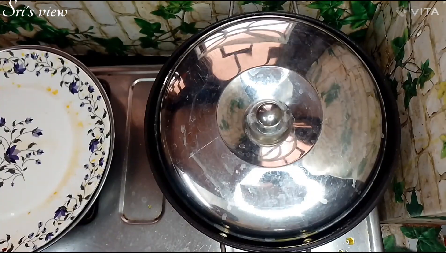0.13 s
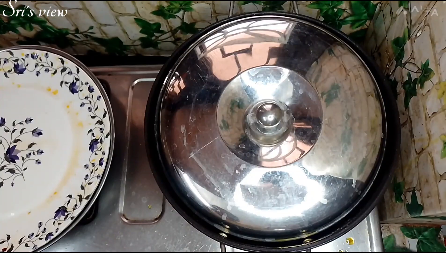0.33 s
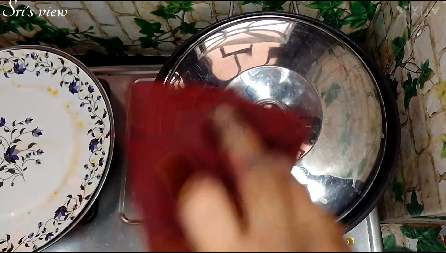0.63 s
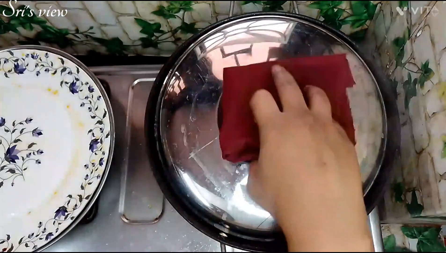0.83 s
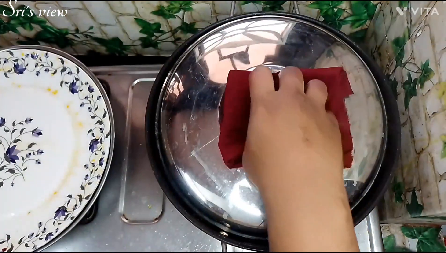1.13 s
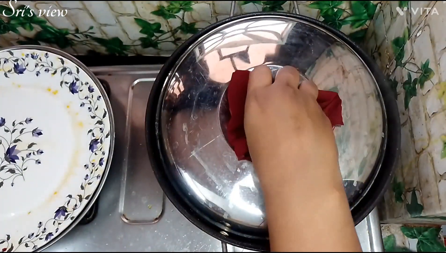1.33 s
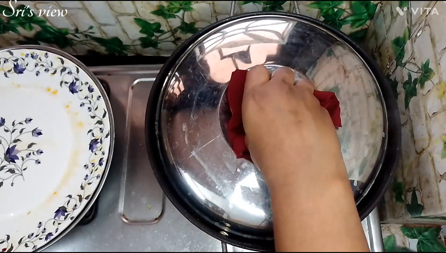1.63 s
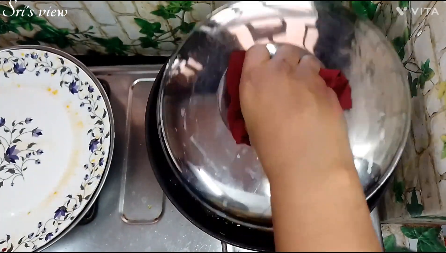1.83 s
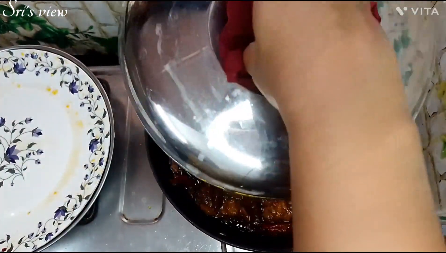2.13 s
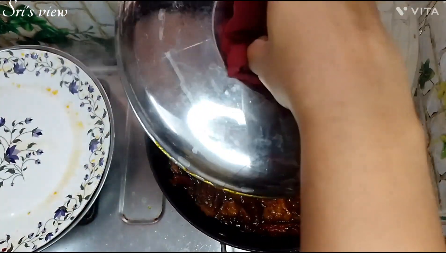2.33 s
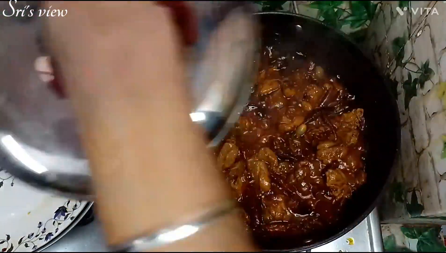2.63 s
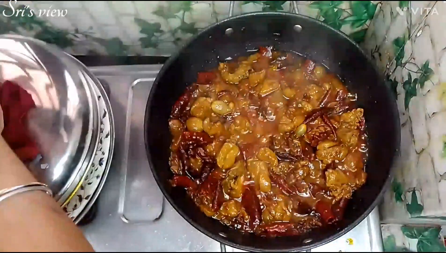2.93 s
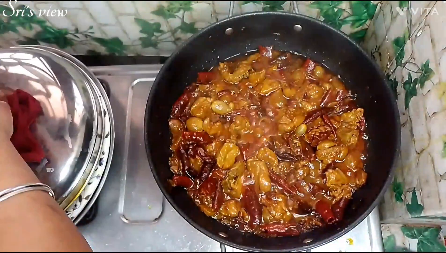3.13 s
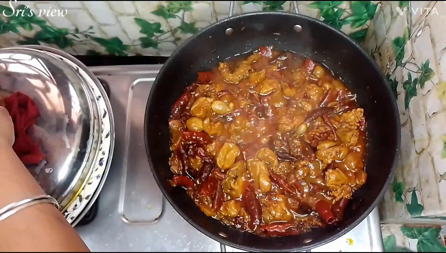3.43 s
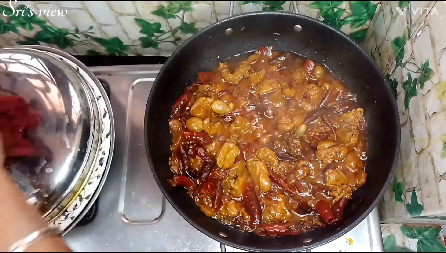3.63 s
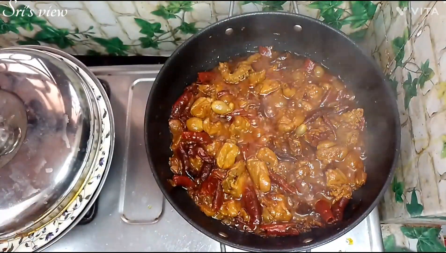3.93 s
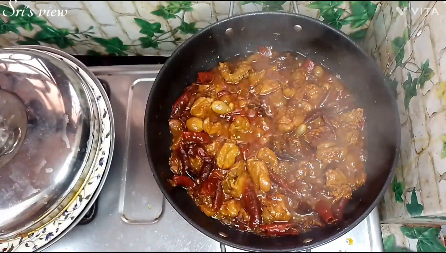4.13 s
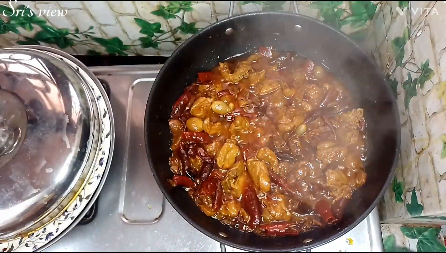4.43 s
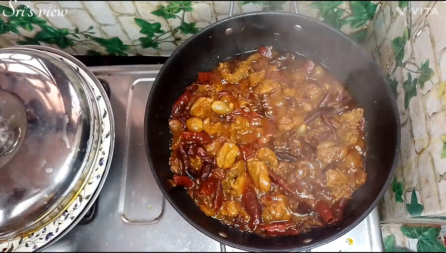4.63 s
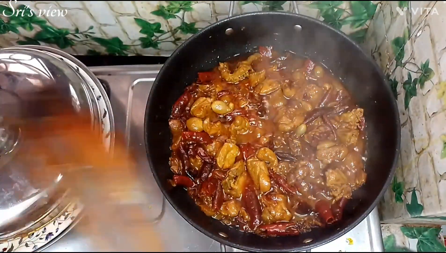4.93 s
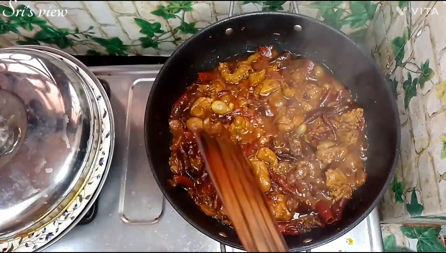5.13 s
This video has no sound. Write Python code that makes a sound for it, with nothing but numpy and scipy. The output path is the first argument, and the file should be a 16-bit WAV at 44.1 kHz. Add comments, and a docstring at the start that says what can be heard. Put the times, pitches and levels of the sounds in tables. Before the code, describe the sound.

A stew simmers faintly under a steel lid in a kitchen, and a crow caws once outside. The lid is gripped with a small knock and scrapes off the rim. The open pan sizzles much louder, spitting and crackling close to the microphone. The lid lands on a plate with two thuds, chatters and rings briefly, and then the sizzle eases.

```python
"""A stew simmers under a steel lid on a gas ring: steam bubbles fizz, larger ones make the trapped air hum.
At 0.5 s a crow caws once outside, its throat pulses ragged, then steadier, then fraying.
The lid is gripped at 1.3 s and dragged off the rim near 2 s, its steel catching and slipping.
The open pan sizzles louder and spits as drops of water burst in the fat.
At 3.4 s the lid thuds onto a plate, chatters and rings; after 4 s the sizzle eases."""
import sys
import numpy as np
from scipy import signal
from scipy.fft import rfft, irfft
from scipy.io import wavfile
from scipy.ndimage import uniform_filter1d

SR = 44100
rng = np.random.default_rng(int(sys.argv[2]) if len(sys.argv) > 2 else 0)


def store_wav(level_fs):
    """Save 16-bit WAV to argv[1]."""
    pcm = np.round(np.clip(np.atleast_2d(level_fs), -1, 1) * 32767)
    wavfile.write(sys.argv[1], SR, pcm.T.astype(np.int16))


N = 232306
LID_ALOFT_S = (2.17, 2.35, 3.0, 3.33)   # leaves the rim, is clear, nears the plate, lands


def from_db(db):
    """Gain of a level in dB."""
    return 10 ** (np.asarray(db) / 20)


def rms_one(x):
    """Scaled to rms 1."""
    return x / np.sqrt(np.mean(x ** 2) + 1e-20)


def envelopes(rows):
    """One curve, sample by sample, for each column after the time."""
    times_s, *columns = np.transpose(rows)
    return [np.interp(np.arange(N) / SR, times_s, column) for column in columns]


def drift(rate_hz):
    """Smooth random modulation of rms 1, rolling off above rate_hz."""
    pole = np.exp(-80 * np.pi * rate_hz / SR)
    slow = signal.lfilter([1], [1, -2 * pole, pole * pole], rng.standard_normal(N // 40 + 2002))[2000:]
    return np.interp(np.arange(N) / 40, np.arange(len(slow)), rms_one(slow))


def resonate(x, modes):
    """Parallel resonances of alternating sign; each mode is pitch_hz, width_hz, level_db."""
    out = np.zeros(len(x))
    for k, (hz, width_hz, level_db) in enumerate(modes):
        r = np.exp(-np.pi * width_hz / SR)
        poles = [1, -2 * r * np.cos(2 * np.pi * hz / SR), r * r]
        gain = (-1) ** k * from_db(level_db) * (1 - r * r) / 2
        out += gain * signal.lfilter([1, 0, -1], poles, x + 1e-18)
    return out


def ring_clear(x, modes):
    """Resonances passed twice, so that the valleys between them stay dark."""
    return resonate(resonate(x, modes), [(hz, 2.18 * width_hz, 0) for hz, width_hz, _ in modes])


def grains(per_s, uneven_db):
    """Random clicks of uneven size and sign; rms 1."""
    sizes = from_db(uneven_db * np.minimum(rng.exponential(1, N), 5)) * rng.choice([-1, 1], N)
    return rms_one(sizes * (rng.random(N) < per_s / SR))


def burst(t60_s):
    """Noise that starts at once and dies away."""
    age = np.arange(int(.3 * SR)) / SR
    return rng.standard_normal(len(age)) * from_db(-60 * age / t60_s)


def add(out, start_s, sound):
    """Mixes a sound in at a time."""
    at = int(start_s * SR)
    out[at:at + len(sound)] += sound[:N - at]


def kitchen_tone(level_db):
    """A steady bed of low rumble and faint hiss."""
    # spectrum of the bed: frequency_hz, level_db
    spectrum = [(12, -39), (20, -5.5), (78, -6), (153, -20), (245, -14), (315, -7), (478, -30), (934, -5),
                (1540, -14), (2690, -17), (8190, -5), (13200, -20), (15600, -9.5)]
    hz, shape_db = np.transpose(spectrum)
    bins_hz = np.fft.rfftfreq(N, 1 / SR) + 1
    colour = from_db(np.interp(np.log(bins_hz), np.log(hz), shape_db))
    return from_db(level_db) * rms_one(irfft(rfft(rng.standard_normal(N)) * colour, N))


def sizzle(level_db, tilt_db):
    """Tiny steam bubbles of many sizes ring a few cycles each, in patches."""
    # colour of the fizz: frequency_hz, level_db
    spectrum = [(940, -76), (1600, -15), (2210, -17), (2780, -9.5), (3990, -9.5), (4350, -17), (4640, -5),
                (4960, -3.5), (7690, 0.5), (12100, 3), (15600, -19.5)]
    shape_hz, shape_db = np.transpose(spectrum)
    surge_db = drift(9) + 1.54 * drift(39)
    out = np.zeros(N)
    for hz in np.geomspace(1500, 15200, 30):
        patch_db = surge_db + 1.3 * drift(4) + 2.6 * drift(25)
        colour_db = np.interp(np.log(hz), np.log(shape_hz), shape_db) + tilt_db * np.log2(hz / 7000)
        pops = from_db(patch_db) * grains(3000, uneven_db=3.5)
        out += from_db(colour_db) * resonate(pops, [(hz, hz / 25, 0)])
    running_rms = np.sqrt(uniform_filter1d(out ** 2, SR // 2))
    return from_db(level_db) * out / running_rms   # the envelope alone sets the slow swell


def pan_ring(x, ring_db):
    """The thin steel rings with the frying; each mode swells and fades as the food and steam shift."""
    # modes of the pan steel: pitch_hz, width_hz, level_db
    pan_modes = [(2800, 70, -2), (3280, 60, -5), (4300, 50, 1), (4870, 80, -2), (5200, 80, 0),
                 (5400, 70, -2), (5700, 60, 0), (6020, 100, 0), (6450, 80, 0), (6920, 100, 0),
                 (7610, 120, 1), (7980, 40, 0), (8300, 90, -2), (8660, 70, -1), (9000, 110, 0),
                 (9700, 70, -1), (10480, 90, -1), (10850, 90, -3), (11250, 70, -2), (11680, 80, -1),
                 (12230, 70, -2), (12520, 80, -3), (13250, 80, -2)]
    rings = sum((-1) ** k * from_db(4 * drift(4) - 1) * resonate(x, [mode])
                for k, mode in enumerate(pan_modes))
    ring_gain = from_db(ring_db)
    return x / np.sqrt(1 + ring_gain ** 2) + ring_gain * rings


def low_voice_gains():
    """Rumble, hum, gurgle, hollow note and gap ring shift as the lid moves and swell for its thud."""
    # hum of the enclosed air: time_s, level_db
    hum_curve = [(0, -79.5), (.28, -69), (.41, -73), (.51, -62.5), (.88, -60), (1.04, -55), (1.17, -62.5),
                 (1.29, -69), (1.39, -60.5), (1.51, -72), (1.83, -77), (1.91, -60.5), (2.08, -58.5),
                 (2.17, -66), (2.9, -72), (3.3, -78), (4.4, -85.5), (4.43, -56), (4.62, -76), (5.27, -79)]
    # air round the moving lid: time_s, hollow_db, gap_db
    open_air = [(0, -77, -78.5), (.43, -88, -82.5), (.52, -70, -83), (1.1, -77, -80), (1.98, -101, -86),
                (2.08, -69, -66), (2.3, -81, -70), (2.65, -80, -62.5), (2.92, -76, -65.5),
                (3.11, -63.5, -67), (3.3, -69, -73.5), (4.1, -78.5, -76), (5.27, -73.5, -71.5)]
    # low thud and fading ring of the lid landing on the plate: start_s, level_db, fade_s (to lose 10 dB)
    thuds = [(3.369, -46, 0.05), (3.533, -47.5, 0.07), (3.6, -66.5, 0.6)]
    thud_rise_s, thud_shares_db = .012, (-18, -2, 1.5, -3, -6.5)
    t = np.arange(N) / SR
    hum_db, = envelopes(hum_curve)
    aloft = np.interp(t, LID_ALOFT_S, [0, 1, 1, 0])
    covered = t < LID_ALOFT_S[0]
    rumble_db = hum_db - 14 - 14 * aloft
    gurgle_db = -70.5 - 3 * covered + 0.26 * (hum_db + 70)
    thud = np.zeros(N)
    for start_s, level_db, fade_s in thuds:
        attack = np.clip((t - start_s) / thud_rise_s + 1, 0, 1)
        thud += attack * from_db(level_db - 10 * np.maximum(t - start_s, 0) / fade_s)
    levels_db = (rumble_db, hum_db, gurgle_db, *envelopes(open_air))
    return [from_db(db) + from_db(share_db) * thud for db, share_db in zip(levels_db, thud_shares_db)]


def pan_air_and_lid_thud():
    """Larger bubbles stir the air between pan and lid; the same resonances voice the lid's landing."""
    # five low voices, each: pitch_hz, width_hz, level_db
    rumble = [(95.3, 15.4, -2), (208.8, 23, 1)]
    hum = [(319, 30, 0), (434.6, 3.4, -3.5)]
    gurgle = [(531, 86, -4), (803, 175, 1), (1016, 190, -1)]
    hollow = [(692, 140, 0)]
    gap = [(395, 47, 6.5), (1316, 94, 3.5)]
    out = np.zeros(N)
    for gain, modes in zip(low_voice_gains(), (rumble, hum, gurgle, hollow, gap)):
        stirring = from_db(1.8 * drift(12)) * grains(1200, uneven_db=2.8)
        out += gain * rms_one(ring_clear(stirring, modes))
    return out


def spits_and_slips(sizzle_db, small_count):
    """Quick clusters of uneven cracks: water drops bursting in the fat, and the lid slipping on the rim."""
    # spits, except the rows at 1.9523, 1.9836 and 2.024 s: bright scraping slips of the lid near 5.5 kHz
    # start_s, level_db, pitch_hz, t60_s
    accents = [(0.2994, -48, 8110, 0.027), (0.7977, -46, 12500, 0.075), (1.0207, -47, 6740, 0.094),
               (1.035, -41.5, 8900, 0.082), (1.2293, -39.5, 10500, 0.11), (1.2707, -44.5, 10600, 0.065),
               (1.3485, -46, 7050, 0.035), (1.9222, -40, 8100, 0.14), (1.9523, -49, 5300, 0.065),
               (1.9836, -33, 5500, 0.055), (2.024, -31.5, 5740, 0.088), (2.1233, -38, 7500, 0.06),
               (2.1507, -31.5, 10800, 0.32), (2.1848, -33, 5100, 0.052), (2.2035, -29, 9500, 0.067),
               (2.2225, -34, 9500, 0.093), (2.3976, -34, 8250, 0.29), (2.5125, -31.5, 9900, 0.039),
               (2.5464, -33.5, 9600, 0.072), (2.5977, -28.5, 7860, 0.12), (2.6226, -26.5, 9900, 0.17),
               (2.667, -32, 5450, 0.11), (2.6894, -32, 6700, 0.26), (2.7438, -32.5, 5400, 0.14),
               (2.866, -30, 6750, 0.059), (2.948, -28, 6850, 0.089), (2.9794, -27.5, 10300, 0.06),
               (2.9995, -25, 7500, 0.24), (3.086, -31.5, 7140, 0.13), (3.113, -23, 9050, 0.15),
               (3.1773, -30.5, 8100, 0.31), (3.2661, -29.5, 11000, 0.063), (3.3569, -20, 8700, 0.13),
               (3.5949, -21.5, 10500, 0.012), (3.762, -28.5, 9500, 0.023), (3.7934, -24, 11600, 0.051),
               (3.8388, -20, 9000, 0.098), (3.985, -26.5, 9900, 0.099), (4.062, -25.5, 11100, 0.09),
               (4.129, -36, 5100, 0.04), (4.1326, -32.5, 9000, 0.095), (4.1742, -31, 9400, 0.05),
               (4.2095, -34.5, 10900, 0.041), (4.257, -32.5, 9600, 0.16), (4.331, -34.5, 11200, 0.044),
               (4.411, -33.5, 9500, 0.13), (4.412, -37.5, 4550, 0.08), (4.452, -35, 10500, .2),
               (4.5067, -32, 10500, 0.06), (4.5274, -32, 10700, 0.12), (4.6804, -36, 8040, 0.075),
               (4.797, -39, 12000, 0.07), (4.871, -36, 8700, 0.033), (4.8953, -35, 7250, 0.099),
               (5.0371, -37, 7450, 0.051), (5.1518, -38, 9800, 0.063), (5.1788, -39, 7000, 0.065),
               (5.111, -44, 13000, .05), (5.2122, -39, 10500, 0.053), (5.254, -41, 7500, 0.046)]
    # lesser spits fall at random and follow the level of the sizzle
    small_spits = [(when * N / SR, sizzle_db[int(when * N)] + 10 - 8 * weak, 8300 * 1.7 ** (high - .5), .06)
                   for when, weak, high in rng.random((small_count, 3))]
    out = np.zeros(N)
    for start_s, level_db, hz, t60_s in list(accents) + small_spits:
        hiss = burst(t60_s)
        crack_db = 2 + 5.1 * np.minimum(rng.exponential(1, len(hiss)), 3.5)
        cracks = 1 + from_db(crack_db) * (rng.random(len(hiss)) < 900 / SR)
        cracks[0] += 10.5   # a sharp opening click
        swell = 1 - 0.64 * np.exp(-np.arange(len(hiss)) / (0.015 * SR))
        band = [(hz, 0.42 * hz, 0)]
        cluster = resonate(resonate(hiss * cracks * swell, band), band)
        attack_rms = np.sqrt(np.mean(cluster[:SR // 50] ** 2))
        add(out, start_s, from_db(level_db - 18.5) * cluster / attack_rms)
    return out


def crow():
    """Hoarse throat pulses; the throat colour rises and sags, and a wider beak adds edge."""
    # contour of the caw: time_s, pitch_hz, level_db, throat_centre_hz
    caw = [(.44, 296, -99, 1500), (.49, 295.7, -66.5, 1470), (.6, 314.7, -55.5, 1970),
           (.65, 314, -54, 2170), (.7, 309.9, -50, 2140), (.78, 305, -50, 1830), (.88, 306.3, -60.5, 1720),
           (1.02, 297.6, -78.5, 1670), (1.1, 298, -101, 1750)]
    # formants of throat and beak: pitch_hz, width_hz, level_db
    throat_modes = [(1474, 150, 9), (1830, 160, 9), (2200, 150, 3)]
    beak_modes = [(2486, 55, -7), (3110, 170, -13.5), (3320, 130, -10)]
    clears_at_s, clearing_s = .6, .06
    t = np.arange(N) / SR
    hz, level_db, centre_hz = envelopes(caw)
    ragged = .5 * np.clip(1 - (t - clears_at_s) / clearing_s, 0, 1)
    fraying = 0.66 * np.maximum(t - clears_at_s - clearing_s, 0)
    rough = np.clip(0.067 + ragged + fraying, 0, 1)
    cycles = np.cumsum(hz * (1 + 0.11 * rough * drift(100))) / SR
    pulses = np.diff(np.floor(cycles), prepend=0) + 0.07 * rough * rng.standard_normal(N)
    beak_db = np.interp(t, (.62, .75, .84, .95), (-12, 6, 6, -12))   # opens, holds wide, narrows
    voice = from_db(beak_db) * resonate(pulses, beak_modes)
    for k, mode in enumerate(throat_modes):
        octaves_off = np.abs(np.log2(mode[0] / centre_hz))
        voice += (-1) ** (k + 1) * from_db(-35 * octaves_off) * resonate(pulses, [mode])
    voice = signal.sosfilt(signal.butter(4, [1400, 3550], "band", fs=SR, output="sos"), voice)
    return from_db(level_db + 1.8 * drift(14)) * voice / np.sqrt(uniform_filter1d(voice ** 2, 2000))


def lid_contacts():
    """Every blow and the four chatters that follow it, each weaker and landing a little elsewhere."""
    # lid gripped and set down: start_s, level_db, centre_hz, clash_db, t60_s, loss_per_chatter_db
    blows = [(1.336, -41, 770, -25, 0.039, 10), (1.38, -61, 900, -27, 0.067, 22),
             (1.444, -50.5, 795, -22, 0.047, 28), (3.357, -26.5, 467, 2.5, 0.27, 2.5),
             (3.46, -40.5, 1240, 1, .27, 25), (3.529, -23, 1054, 0.5, 0.055, 5),
             (3.531, -32, 275, -20, 0.092, 25), (3.599, -37.5, 1270, -25, 0.4, 28),
             (3.657, -46.5, 1170, 9, 0.24, 25), (3.689, -46, 880, -3, 0.15, 25),
             (3.74, -42.5, 770, 0.5, 0.29, 21), (3.86, -47, 1030, -11, 0.32, 5),
             (3.95, -49.5, 950, -2, 0.41, 30), (4.13, -55.5, 3020, 10.5, 0.09, 25),
             (4.408, -52.5, 1010, 7, 0.14, 15), (4.416, -45, 322, 2, 0.073, 10)]
    gap_s, scatter_octaves = .018, 0.23
    contacts = []
    for start_s, level_db, hz, clash_db, t60_s, loss_db in blows:
        for k in range(5):
            at_s = start_s + gap_s * k * rng.uniform(.92, 1.08)
            octaves = scatter_octaves * rng.uniform(-1, 1) * (k > 0)
            contacts.append((at_s, level_db - loss_db * k, hz * 2 ** octaves, clash_db, t60_s))
    return contacts


def lid_knocks():
    """Each contact rattles the lid modes near its centre pitch; hard blows also clash in the treble."""
    # modes of the lid steel: pitch_hz, width_hz, level_db
    lid_modes = [(209, 56, -12), (311, 13, -6), (440, 14, -3), (479.4, 16, -4.5), (499, 21, -2.5),
                 (633, 64, -9), (730, 100, -11.5), (811, 20, 2.5), (905, 48, 1.5), (1000, 49, 4.5),
                 (1045, 16, 6.5), (1090, 71, 0), (1171, 61, 2.5), (1252, 62, 3), (1450, 71, -5),
                 (1845, 270, -10.5), (2260, 59, -10), (2460, 45, -8), (2715, 30, -3), (2777, 31, -6),
                 (3290, 120, -13), (3630, 22, -8.5), (4420, 21, -10), (5200, 52, -22), (5680, 75, -31),
                 (6200, 46, -19), (6990, 31, -7), (7890, 50, -47)]
    treble_modes = lid_modes[len(lid_modes) // 2:] + [(5570, 2700, -17)]
    out = np.zeros(N)
    for start_s, level_db, hz, clash_db, t60_s in lid_contacts():
        rattle = burst(t60_s)
        band = [(hz, 0.66 * hz, 0)]
        body = resonate(resonate(resonate(rattle, lid_modes), band), band)
        clash = resonate(rattle, treble_modes)
        knock = body / np.abs(body).max() + from_db(clash_db) * clash / np.abs(clash).max()
        add(out, start_s, from_db(level_db - 6) * knock)
    return out


def lid_drag():
    """Steel catches and slips on the rim in uneven clicks; off the rim only the low modes are stirred."""
    # the pull across the rim: time_s, level_db, outer_edge_db
    pull = [(1.86, -92, -1), (1.95, -62, -10), (2.0, -51, -6), (2.05, -45.5, -8.5), (2.09, -56.5, 2.5),
            (2.15, -59, 6), (2.175, -76, 10), (2.24, -55.5, 5.5), (2.4, -63.5, -16)]
    # modes of the rim and its outer edge: pitch_hz, width_hz, level_db
    rim_modes = [(415.5, 42, 1.5), (1150, 160, -12.5), (1397, 57, -9), (2440, 270, -19.5), (2590, 23, -34),
                 (3897, 34, -9), (5040, 25, 0.5), (5210, 63, -4), (5500, 22, -8)]
    edge_modes = [(562, 42, -5.5), (818, 49, -5.5), (3030, 93, -7.5), (4740, 93, -8)]
    level_db, edge_db = envelopes([(pull[0][0] - .03, -100, 0), *pull, (pull[-1][0] + .1, -100, 0)])
    slips = from_db(2.4 * drift(38)) * grains(3000, uneven_db=3)
    scrape = ring_clear(slips, rim_modes) + from_db(edge_db) * ring_clear(slips, edge_modes)
    off_rim = np.clip((np.arange(N) / SR - LID_ALOFT_S[0]) / 0.023, 0, 1)
    dull = signal.sosfilt(signal.butter(4, 750, fs=SR, output="sos"), scrape)
    return from_db(level_db) * rms_one((1 - off_rim) * scrape + off_rim * dull)


def room(x, level_db, t60_s, wall_cut_hz):
    """A diffuse tail, duller than the direct sound."""
    age = np.arange(int(.8 * SR)) / SR
    tail = rng.standard_normal(len(age)) * from_db(-60 * age / t60_s) * (age > .006)
    tail = signal.sosfilt(signal.butter(1, wall_cut_hz, fs=SR, output="sos"), tail)
    return from_db(level_db) * signal.fftconvolve(x, tail / np.sqrt(np.sum(tail ** 2)))[:N]


def scene():
    """The dry pan, with drag, knocks and crow in a short reverb, over the steady kitchen tone; mono."""
    # swell and brightness of the sizzle: time_s, level_db, tilt_db_per_octave
    simmer = [(0, -65, -3), (1.2, -65.5, -3), (1.87, -70.5, -3), (1.97, -54, -7.5), (2.15, -52.5, 0),
              (2.35, -54.5, -1), (2.8, -51, -1), (2.95, -45.5, -0.5), (3.2, -48.5, -0.5), (3.33, -53, -1.5),
              (3.4, -46, -4), (3.61, -44, -7), (3.72, -48.5, -2.5), (3.93, -45, 0), (4.2, -55, -3),
              (4.5, -57.5, -3.5), (4.75, -57, -5), (5.27, -58, -4)]
    sizzle_db, tilt_db = envelopes(simmer)
    crackle = spits_and_slips(sizzle_db, small_count=24) + sizzle(sizzle_db, tilt_db)
    pan = pan_ring(crackle, ring_db=-0.5 + 0.4 * (sizzle_db + 50))   # louder frying rings more
    lid_and_crow = lid_drag() + lid_knocks() + crow()
    bed = kitchen_tone(level_db=-64.5)
    reverb = room(lid_and_crow, level_db=-11.5, t60_s=0.23, wall_cut_hz=3000)
    return (lid_and_crow + reverb + pan + pan_air_and_lid_thud() + bed)[None]


def record(dry):
    """A steep low-pass takes off the very top."""
    cutoff_hz = 15560
    return signal.sosfilt(signal.ellip(14, .3, 75, cutoff_hz, fs=SR, output="sos"), dry)


dry = scene()
out = record(dry)
store_wav(out)
```